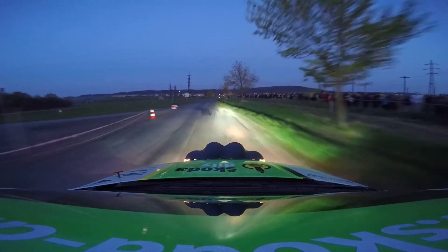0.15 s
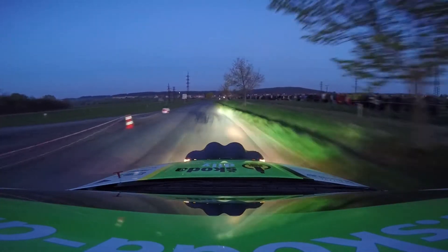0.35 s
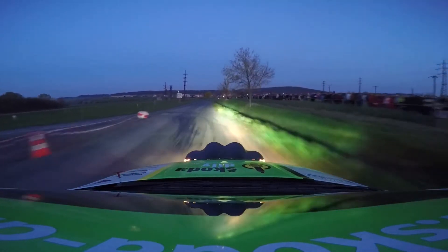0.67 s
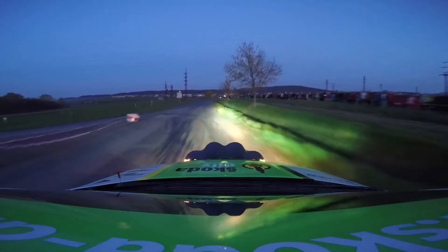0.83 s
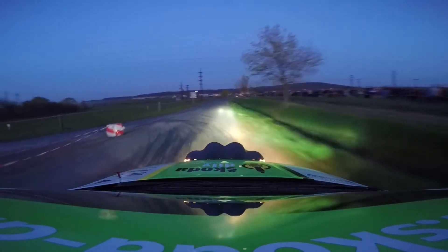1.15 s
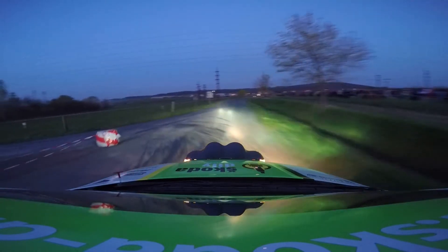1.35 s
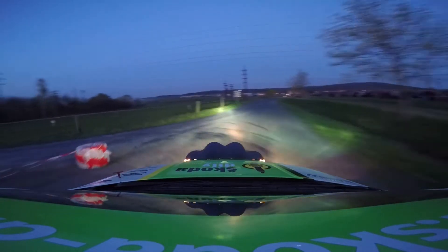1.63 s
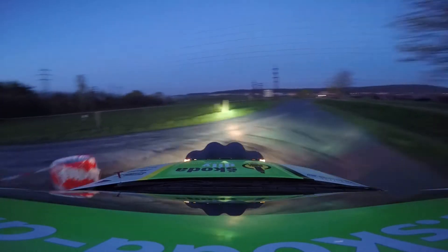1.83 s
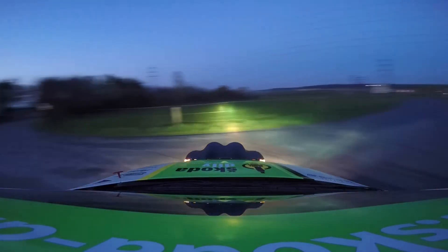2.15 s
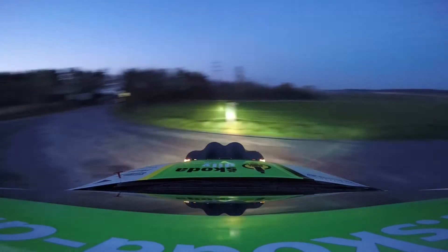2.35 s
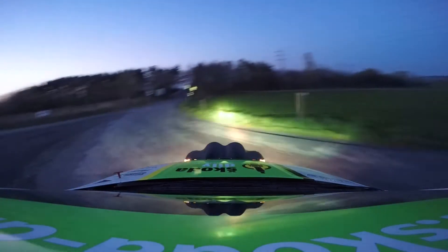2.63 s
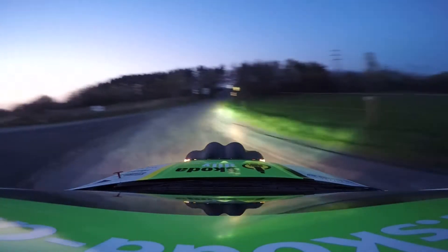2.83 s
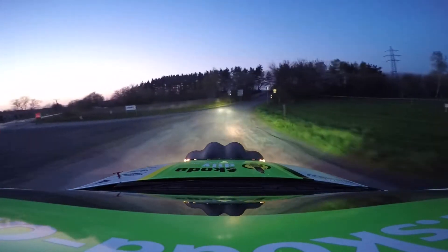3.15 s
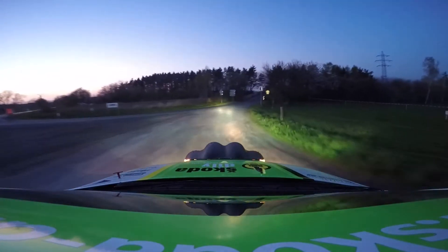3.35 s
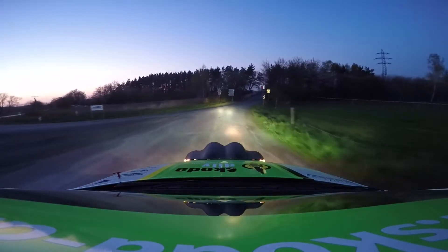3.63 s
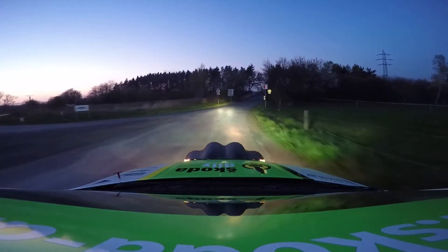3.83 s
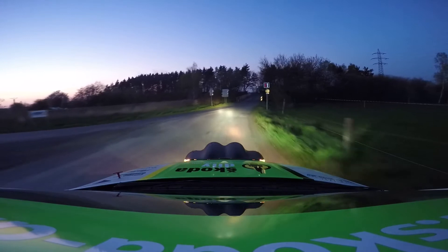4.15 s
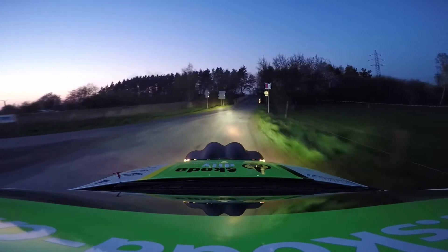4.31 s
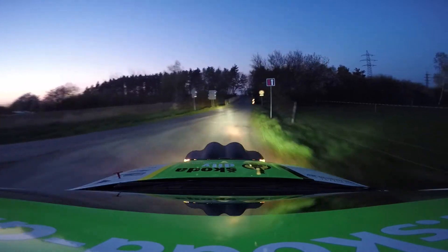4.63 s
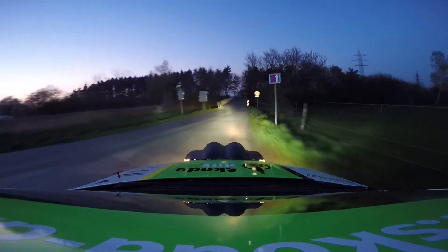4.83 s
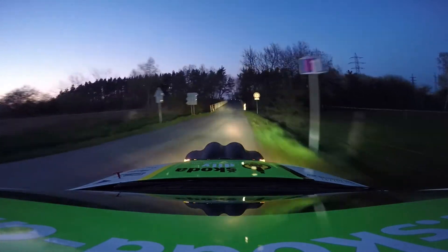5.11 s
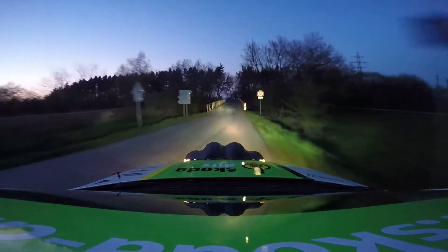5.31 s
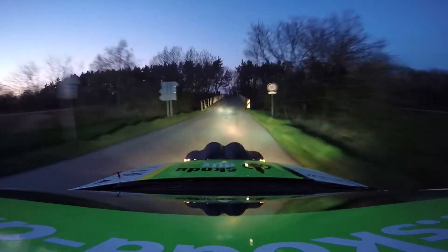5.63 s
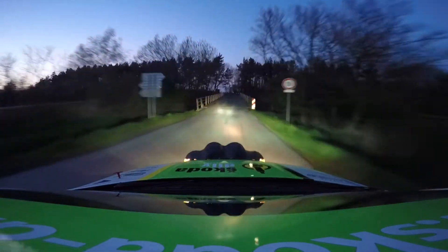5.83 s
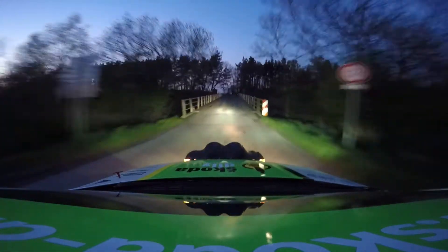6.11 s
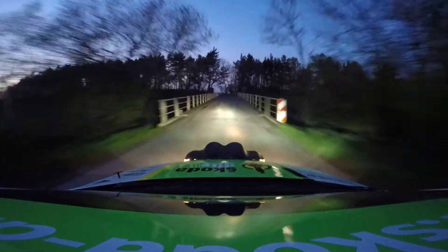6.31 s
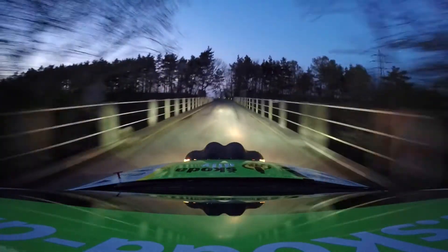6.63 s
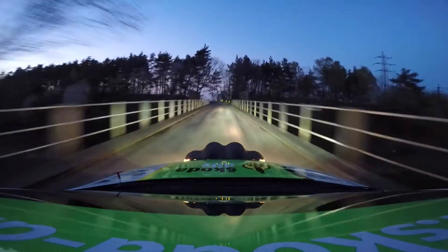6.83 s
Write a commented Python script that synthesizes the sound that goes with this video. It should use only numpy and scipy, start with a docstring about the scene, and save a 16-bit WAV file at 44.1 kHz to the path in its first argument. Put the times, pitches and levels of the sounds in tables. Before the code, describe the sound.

A four-cylinder rally car engine drones through a booming exhaust, heard close from the car's roof. The pitch sinks as it brakes for a hairpin, with three throttle blips and tyres scrubbing and chirping. The wheels spin and shudder as it accelerates, the revs climbing to an upshift that sets off a rapid string of exhaust bangs and cracks. The engine then pulls again under rising wind, with mechanical clatter behind it.

```python
"""A four-cylinder engine drones through a booming exhaust, heard from the roof of a rally car.
The car brakes for a hairpin and scrubs round it; its tyres stick and slip, judder, chirp and shudder.
It accelerates away, and at the upshift unburnt fuel bangs in the exhaust. Then the engine pulls again
under rising wind. Behind it the block clatters, a panel buzzes and the turbocharger hisses."""
import sys
import numpy as np
from scipy import signal
from scipy.fft import rfft, irfft
from scipy.io import wavfile
from scipy.ndimage import uniform_filter1d

SR = 44100
rng = np.random.default_rng(int(sys.argv[2]) if len(sys.argv) > 2 else 0)


def output_pcm(signal):
    """Save a mono or channel-first signal as 16-bit PCM at the path in sys.argv[1].

    Samples are clipped to [-1, 1] before scaling.
    """
    pcm = np.clip(np.atleast_2d(signal).T, -1, 1) * 32767
    wavfile.write(sys.argv[1], SR, np.round(pcm).astype(np.int16))


N = 306936
T = np.arange(N) / SR
MID_FIRING_HZ = 80


# Engine speed through braking, three blips, pull away, upshift: time_s, firing_hz
ENGINE_SPEED = [(0, 123.5), (.33, 121.6), (.5, 113.3), (.65, 108.6), (.9, 94.5), (1.1, 88), (1.3, 77.6),
                (1.42, 80), (1.75, 67.5), (2, 58.6), (2.19, 55.5), (2.36, 74.9), (2.47, 52), (2.62, 61.1),
                (2.8, 52.9), (2.95, 65.4), (3.1, 49.5), (3.25, 56), (3.75, 68), (4, 75.1), (4.25, 84),
                (4.68, 105.5), (4.85, 137.8), (5.25, 178), (5.7, 160), (5.8, 106), (6.3, 106),
                (6.52, 116.2), (6.96, 127)]
# Throttle load on the exhaust (effort) and on the block (strain): time_s, effort_db, strain_db
ENGINE_LOAD = [(0, -5, -4.5), (.42, 1, -0.5), (.85, -14.5, -13), (1.05, -14, -10.5), (1.35, -3.5, -5),
               (1.7, -8, -8.5), (2.12, -6, -6), (2.4, 0.5, 4), (2.6, -9, -6), (3.45, -8, -7),
               (3.7, -10.5, 0), (4.55, -1, -4.5), (4.75, -10.5, -8), (5.28, 4, 3), (5.7, -10.5, -9.5),
               (6.3, -11, -9.5), (6.55, -17, -7), (6.96, -10.5, -9.5)]

def engine_state():
    """Firing rate, running count of firings, and the two loads that follow the throttle."""
    firing_hz = curves(ENGINE_SPEED)[0] * (1 + .002 * wander(15))
    effort_db, strain_db = curves(ENGINE_LOAD)
    return firing_hz, np.cumsum(firing_hz) / SR, effort_db, strain_db


# Firing tone across the pipe's resonances, at 0 dB effort: firing_hz, level_db
DRONE_LEVELS = [(50, -17.5), (68, -16), (86, -14.5), (105, -7.5), (124, -13.5), (135, -24), (158, -25.5),
                (178, -19.5)]
# Firing tone dropouts, brief under braking, long at the upshift: start_s, length_s, depth_db
DROPOUTS = [(0.796, 0.14, -13.5), (0.959, 0.077, -30), (1.587, 0.15, -10), (5.292, 1.18, -21.5)]

def exhaust(firings, firing_hz, effort_db):
    """The pipe sounds the firing tone, the other engine orders and its own boom."""
    dropout_db = sum(db * ramped(start, length, ramp_s=.072) for start, length, db in DROPOUTS)
    burble_db = 2.8 * (1 - steadiness(firing_hz)) * wander(19)
    drone_gain = gain_at(DRONE_LEVELS, firing_hz) * amp(.2 * effort_db + dropout_db + burble_db)
    drone = drone_gain * np.sqrt(2) * np.sin(2 * np.pi * firings)
    boom = pipe_boom() * driven(effort_db, firing_hz, base_db=-20.5, db_per_load_db=.2, db_per_oct=-.8)
    orders_gain = driven(effort_db, firing_hz, base_db=-17, db_per_load_db=.5, db_per_oct=0)
    orders = orders_gain * engine_orders(firings, firing_hz)
    return drone + amp(.31 * dropout_db) * (orders + boom)


def pipe_boom():
    """Uneven combustion stirs the pipe's low resonance."""
    boom = narrow_band(noise(), [(102.9, 22.6, 0)])
    local_power = uniform_filter1d(boom ** 2, size=6000)
    return boom / np.sqrt(local_power + .026)


# Tones of unequal cylinders: firing_multiple, level_db
ORDERS = [(.25, -3), (.5, -10), (.75, -9.5), (1.5, -18), (2, 1.5), (2.5, -10), (3, -4), (4, -9)]
# Exhaust pipe response: freq_hz, gain_db
PIPE_RESPONSE = [(30, -17), (70, -11.5), (108, 9.5), (135, -5), (150, -14.5), (177, -6.5), (215, -24.5),
                 (340, -15.5), (500, -7.5), (700, -30)]

def engine_orders(firings, firing_hz, waver=.32, smear_rad=.16):
    """Orders swell as they sweep the pipe's resonances; uneven timing smears the higher ones."""
    tones = np.zeros(N)
    for multiple, db in ORDERS:
        gain = amp(db) * gain_at(PIPE_RESPONSE, firing_hz * multiple) * (1 + waver * wander(12))
        phase = multiple * (2 * np.pi * firings + smear_rad * wander(24))
        tones += gain * np.sin(phase)
    return tones


# Gas puff spectrum: freq_hz, gain_db
RASP_SPECTRUM = [(100, -25), (220, -3.5), (300, 1), (360, 2.5), (490, 3), (560, -1.5), (800, -2),
                 (1150, -14), (1700, -10), (3000, -46)]

def exhaust_rasp(firings, firing_hz, stroke, effort_db):
    """Each firing puffs gas out of the pipe."""
    puffs = cycle_noise(firings, firing_hz) * (.5 + stroke) * lope(firings)
    gain = driven(effort_db, firing_hz, base_db=-31, db_per_load_db=.43, db_per_oct=2.5)
    return gain * unit_rms(colour(puffs, RASP_SPECTRUM))


def cycle_noise(firings, firing_hz, size=1024):
    """Gas noise that recurs every four firings, partly renewed each cycle."""
    position = firings / 4
    cycles = rng.standard_normal((int(position[-1]) + 2, size))
    alike = np.interp(np.arange(len(cycles)), position, steadiness(firing_hz))
    for k in range(1, len(cycles)):
        cycles[k] = alike[k] * cycles[k - 1] + np.sqrt(1 - alike[k] ** 2) * cycles[k]
    gas = np.interp(position * size, np.arange(cycles.size), cycles.ravel())
    return unit_rms(gas * np.sqrt(firing_hz))


# Likeness of successive engine cycles: firing_hz, correlation
CYCLE_LIKENESS = [(52, 0.28), (85, 0.46), (118, 0.74), (150, 0.6), (178, 0.2)]

def steadiness(firing_hz):
    """Combustion is most regular at middling revs, lumpy below and ragged near the limit."""
    return np.interp(firing_hz, *np.transpose(CYCLE_LIKENESS))


def lope(firings):
    """One cylinder is stronger than the other three."""
    return 1 + .11 * np.cos(np.pi / 2 * firings)


# Explosions in the exhaust: start_s, boom_db, bark_db
BACKFIRES = [(5.324, 1, -17.5), (5.350, 3.5, -9), (5.404, -0.5, -20.5), (5.439, -2, -20.5),
             (5.528, -5.5, -39), (5.753, 0, -20.5), (5.846, -1, -13.5), (5.915, -3.5, -13),
             (5.990, -1.5, -17.5), (6.063, -4, -20), (6.127, -5, -21.5), (6.198, -4, -27), (6.269, -7, -25),
             (6.34, -4.5, -17.5), (6.401, -4.5, -24.5)]
# Pressure jump spectrum: freq_hz, gain_db
BARK_SPECTRUM = [(100, 10.5), (170, -9), (300, 5.5), (450, 3), (750, -0.5), (1150, -5.5), (1600, -16),
                 (2300, -16), (3000, -20.5), (5000, -48), (12000, -57.5)]

def backfires(boom_hz=101, boom_attack_s=.0025, boom_decay_s=.039, bark_decay_s=.025, echo_s=.0058):
    """A pressure jump barks out of the exhaust and leaves the pipe ringing."""
    mix, t = np.zeros(N), T[:SR // 4]
    boom_envelope = np.exp(-t / boom_decay_s) * (1 - np.exp(-t / boom_attack_s))
    boom = -np.sin(2 * np.pi * boom_hz * t) * boom_envelope
    for start, boom_db, bark_db in BACKFIRES:
        burst = rng.standard_normal(len(t)) * np.exp(-t / bark_decay_s)
        burst[0] -= 24
        burst[round(echo_s * SR)] += 15  # the jump returns inverted from the pipe's far end
        bark = colour(burst, BARK_SPECTRUM)
        add(mix, start, amp(boom_db) * boom + amp(bark_db) * bark / np.std(bark[:SR // 100]))
    return mix


# Cracks at the tailpipe: start_s, peak_db
TAILPIPE_CRACKS = [(5.352, -12), (5.3649, -9), (5.4393, -12), (5.8516, -9), (5.8673, -16), (5.8808, -9),
                   (5.918, -17), (5.923, -10.5), (5.9469, -10), (5.987, -19), (6.0224, -11), (6.0597, -4.5),
                   (6.082, -15), (6.0913, -5), (6.145, -18), (6.1733, -17.5), (6.3415, -24)]
# Crack spectrum: freq_hz, gain_db
CRACK_SPECTRUM = [(150, 13), (500, 8.5), (1200, 2.5), (2700, -6.5), (4000, -21), (7000, -29.5),
                  (14000, -46)]

def tailpipe_cracks(decay_s=.0031):
    """Sharp pressure spikes, each with a short tail of noise."""
    mix, t = np.zeros(N), T[:SR // 4]
    for start, peak_db in TAILPIPE_CRACKS:
        burst = rng.standard_normal(len(t)) * np.exp(-t / decay_s)
        burst[0] -= 8
        crack = colour(burst, CRACK_SPECTRUM)
        add(mix, start, amp(peak_db) * crack / abs(crack).max())
    return mix


# Short tyre slips: start_s, length_s, scrub_db, squeal_db
TYRE_SLIPS = [(1.103, 0.0095, -27.5, -39), (1.145, 0.018, -27.5, -49), (1.256, 0.038, -30, -47),
              (1.338, 0.022, -22, -37), (1.475, 0.079, -25, -35), (1.803, 0.011, -22.5, -49),
              (1.894, 0.098, -25, -19), (2.433, 0.074, -14.5, -35), (3.115, 0.063, -30.5, -55),
              (3.499, 0.036, -35.5, -34)]
# Tread and squeal resonances: pitch_hz, width_hz, gain_db
TREAD_MODES = [(465, 40, -6), (531, 25, -8), (912, 35, 0), (1050, 35, 0), (1235, 30, -8), (1428, 40, -1),
               (1568, 40, -4), (1755, 45, -4), (1857, 35, 3), (2190, 40, -5), (2289, 16, -2),
               (2372, 25, -4), (2489, 16, -1), (2561, 14, -1), (2720, 40, -11), (3085, 45, -6),
               (3250, 55, -8), (3670, 50, -6), (4390, 70, -5)]
SQUEAL_MODES = [(924, 18, -3), (1523, 22, -1), (1610, 25, -4), (1708, 30, 2), (1796, 22, 0), (1854, 20, -2),
                (1988, 28, -4), (2173, 18, -8), (2357, 30, -2), (2473, 20, 0), (3240, 50, -13)]
# Radiation of tread ring, squeal and grit: freq_hz, gain_db
TREAD_SPECTRUM = [(400, 3), (800, 5.5), (2600, -1.5), (2850, 2.5), (3250, -3), (3600, -13), (4400, -13.5),
                  (5300, -25), (12000, -41)]
SQUEAL_SPECTRUM = [(700, 2.5), (1500, 5), (2500, 5), (3200, -5.5), (8000, -32)]
GRIT_SPECTRUM = [(240, -28), (400, -6), (615, 1), (1040, 0.5), (1290, -1), (1840, 0), (2070, -2.5),
                 (2580, -11), (2860, -32), (3130, -21.5), (4010, -38.5), (4450, -29), (9000, -47.5),
                 (11700, -87), (19800, -120)]
SPIN_START_S, SPIN_LENGTH_S = 3.495, .82

def tyres(judder_db=3, judder_hz=163, fade_db_per_s=49):
    """Rubber sticks and slips in a rapid judder that rings the tread; a harder slip squeals."""
    spin = amp(-27.5) * held(SPIN_START_S, SPIN_LENGTH_S, attack_s=.044, release_s=.23) + surges()
    slide = amp(-42) * ramped(start_s=1.42, length_s=3.65, ramp_s=.23)  # light scrub all through the bend
    squeal = amp(-10.5) * spin
    for start, length, scrub_db, squeal_db in TYRE_SLIPS:
        bite = amp(scrub_db - fade_db_per_s * abs(T - start))
        slide += bite * held(start, length, attack_s=.0056, release_s=.021)
        squeal += amp(squeal_db) * held(start, length, attack_s=.0015, release_s=.011)
    judder = amp(judder_db * wander(judder_hz))
    tread = unit_rms(colour(ring(noise() * judder, TREAD_MODES), TREAD_SPECTRUM))
    grit = unit_rms(colour(noise() * judder, GRIT_SPECTRUM))
    chirp = unit_rms(colour(ring(noise() * judder, SQUEAL_MODES), SQUEAL_SPECTRUM))
    grind = amp(-5) * slide + amp(-11) * spin
    return amp(-5) * (slide + spin) * tread + grind * grit + squeal * chirp


# Wheelspin surges: start_s, length_s, level_db
SPIN_SURGES = [(3.54, 0.072, -15), (3.801, 0.092, -17), (4.043, 0.056, -14.5)]

def surges():
    """Each surge of wheelspin swells, holds briefly and ebbs."""
    return sum(amp(db) * held(start, length, attack_s=.035, release_s=.04)
               for start, length, db in SPIN_SURGES)


def wheel_shudder(base_hz=129, lift_hz=11.15):
    """The wheels hum as the car powers out of the bend; each surge lifts the pitch."""
    surge = surges()
    pitch_hz = base_hz + lift_hz * np.sqrt(surge / surge.max())
    envelope = held(SPIN_START_S, SPIN_LENGTH_S, attack_s=.041, release_s=.07)
    hum = np.sqrt(2) * np.sin(2 * np.pi * np.cumsum(pitch_hz) / SR)
    return envelope * amp(-17.5 + 2 * wander(60)) * hum


# Block rattle spectrum: freq_hz, gain_db
CLATTER_SPECTRUM = [(600, -13.5), (1150, -9), (1400, -2.5), (1850, 0), (2100, -5), (2550, -12.5),
                    (2900, -18.5), (3200, -13.5), (3550, -28.5), (4200, -21), (4900, -22.5), (5400, -32),
                    (7000, -31.5), (7500, -42.5), (12500, -40.5), (14000, -50)]
# Panel and cover resonances: pitch_hz, width_hz, gain_db
PANEL_MODES = [(487, 25, -4), (920, 30, -8), (1057, 35, -8), (1422, 35, -4), (1527, 35, -7), (1740, 40, -2),
               (1857, 28, 2), (2358, 18, -4), (3085, 50, -6), (4145, 60, -5), (4950, 200, -3)]

def block_clatter(firings, firing_hz, stroke, strain_db):
    """Each firing rattles the block; low revs shake the panels most."""
    rattle = cycle_noise(firings, firing_hz) + .65 * noise()
    knocks = colour(rattle * (2.7 + stroke) * lope(firings), CLATTER_SPECTRUM)
    shake = amp(-2.5 - 12 * np.log2(firing_hz / MID_FIRING_HZ))
    clatter = (knocks + shake * ring(knocks, PANEL_MODES)) / np.sqrt(1 + .66 * shake)
    gain = driven(strain_db, firing_hz, base_db=-30.5, db_per_load_db=.9, db_per_oct=-.3)
    return gain * unit_rms(clatter)


# Panel buzzes in the bend and on rising revs: centre_s, half_length_s, level_db
BUZZ_SWELLS = [(2.01, 0.055, -29), (2.34, 0.067, -29.5), (3, 0.035, -38), (4.52, 0.19, -33.5),
               (6.82, 0.17, -37)]
# Buzzing panel resonances: pitch_hz, width_hz, gain_db
BUZZ_RESONANCES = [(1800, 95, -0.5), (1866, 51, 0)]

def panel_buzz(firings):
    """A panel, shaken at every firing, rings in a narrow band."""
    shaking = noise() * (1 + .55 * np.cos(2 * np.pi * firings))
    return swells(BUZZ_SWELLS) * narrow_band(shaking, BUZZ_RESONANCES)


# Air rush, rising and falling with the car's speed: time_s, level_db
AIR_LEVELS = [(0, -37.5), (.45, -35.5), (1.1, -53), (1.8, -53.5), (3.45, -55), (4.2, -45.5), (5.25, -41),
              (6.2, -44), (6.96, -35.5)]
# Air rush spectrum: freq_hz, gain_db
AIR_SPECTRUM = [(1500, -15.5), (2500, 2.5), (2900, -1.5), (3300, 2.5), (3900, -1), (4300, -2),
                (5150, -14.5), (6100, -10.5), (7300, -24.5), (8100, -17), (9200, -25), (10500, -22),
                (11400, -35), (15000, -35.5)]

def air_rush(firings, stroke):
    """Rushing air hisses, pulsing with the firings."""
    hiss = unit_rms(colour(noise() * (1 + .66 * stroke) * lope(firings), AIR_SPECTRUM))
    return amp(curves(AIR_LEVELS)[0] + 1.8 * wander(35)) * hiss


# Gusts: centre_s, half_length_s, level_db
WIND_GUSTS = [(.15, 0.21, -27.5), (1.476, 0.032, -30), (1.764, 0.069, -32), (5.26, 0.091, -22),
              (6, .2, -34), (6.94, .15, -33)]
# Wind rumble spectrum: freq_hz, gain_db
BUFFET_SPECTRUM = [(8, -9), (25, -4.5), (45, -1.5), (80, 1.5), (200, -12.5), (400, -37)]

def wind_buffet(lull_db=-43.5):
    """Gusts buffet the microphone with an uneven rumble."""
    rumble = unit_rms(colour(noise(), BUFFET_SPECTRUM)) * amp(6.4 * wander(9.5))
    return (amp(lull_db) + swells(WIND_GUSTS)) * rumble


# Turbocharger hiss as boost builds and falls: time_s, level_db
BOOST_LEVELS = [(2.1, -81), (2.34, -57), (2.65, -67), (3.6, -70.5), (4.45, -51.5), (4.8, -66), (5.4, -72),
                (6.96, -89)]
# Intake hiss spectrum: freq_hz, gain_db
INTAKE_SPECTRUM = [(4500, -13.5), (5700, -2.5), (6900, 2.5), (7350, -7), (8300, -4.5), (9300, -9.5),
                   (10500, -10), (11300, -14), (12400, -7.5), (13200, -16), (14300, -14), (15200, -29)]
# Hoarse whistles as the throttle shuts: centre_s, half_length_s, level_db
FLUTTER_SWELLS = [(.84, 0.02, -43.5), (1.03, .035, -48)]
# Whistle resonance: pitch_hz, width_hz, gain_db
FLUTTER_RESONANCE = [(3670, 800, 0)]

def turbo():
    """The compressor draws air in a wide, high hiss and flutters when the driver lifts."""
    boost = amp(curves(BOOST_LEVELS)[0] + .8 * wander(40))
    hiss = boost * unit_rms(colour(noise(), INTAKE_SPECTRUM))
    flutter = swells(FLUTTER_SWELLS) * narrow_band(noise(), FLUTTER_RESONANCE)
    return hiss + flutter


def driven(load_db, firing_hz, base_db, db_per_load_db, db_per_oct):
    """Gain of an engine sound that follows load and speed."""
    return amp(base_db + db_per_load_db * load_db + db_per_oct * np.log2(firing_hz / MID_FIRING_HZ))


def amp(db):
    """Decibels to gain."""
    return 10 ** (np.asarray(db) / 20)


def unit_rms(x):
    """Scales to an rms of one."""
    return x / np.sqrt(np.mean(x ** 2) + 1e-20)


def curves(rows):
    """Each column after the first, joined by straight lines in time."""
    times, *columns = np.transpose(rows)
    return [np.interp(T, times, column) for column in columns]


def gain_at(spectrum, hz):
    """Gain of a spectrum at the given frequencies."""
    freq_hz, db = np.transpose(spectrum)
    return amp(np.interp(np.log(hz + 1), np.log(freq_hz + 1), db))


def colour(x, spectrum, size=8192):
    """Minimum-phase filter with the given spectrum, falling away past its ends."""
    hz = abs(np.fft.fftfreq(size, 1 / SR))
    low_hz, high_hz = spectrum[0][0] / 2, spectrum[-1][0] * 2
    skirts = 1 / (1 + (hz / high_hz) ** 4) / (1 + (low_hz / (hz + 1)) ** 4)
    log_gain = np.log(gain_at(spectrum, hz) * skirts + 1e-5)
    response = np.exp(np.conj(signal.hilbert(log_gain)))
    return signal.oaconvolve(x, irfft(response[:size // 2 + 1]))[:len(x)]


def ring(x, modes):
    """Passes x through a bank of resonances."""
    return sum(amp(db) * signal.lfilter(*signal.iirpeak(hz, hz / width_hz, fs=SR), x)
               for hz, width_hz, db in modes)


def narrow_band(x, modes):
    """Two passes through the resonances, at unit rms."""
    return unit_rms(ring(ring(x, modes), modes))


def noise():
    """White noise for the whole scene."""
    return rng.standard_normal(N)


def wander(rate_hz):
    """Smooth random motion up to the given rate."""
    hz = np.fft.rfftfreq(N // 32, 32 / SR)
    spectrum = rfft(rng.standard_normal(N // 32)) / (1 + (hz / rate_hz) ** 4)
    slow = unit_rms(irfft(spectrum))
    return np.interp(T, np.linspace(0, T[-1], len(slow)), slow)


def held(start_s, length_s, attack_s, release_s):
    """Envelope that rises, holds and dies away."""
    t = np.maximum(T - start_s, 0)
    return (1 - np.exp(-t / attack_s)) * np.exp(-np.maximum(t - length_s, 0) / release_s)


def ramped(start_s, length_s, ramp_s):
    """Window with straight ramps at both ends."""
    return np.clip(np.minimum(T - start_s, start_s + length_s - T) / ramp_s, 0, 1)


def swells(rows):
    """A bell-shaped rise and fall for each row."""
    return sum(amp(db) * np.exp(-((T - centre) / half_length) ** 2) for centre, half_length, db in rows)


def add(mix, start_s, sound):
    """Mixes a sound in at start_s."""
    part = mix[round(start_s * SR):][:len(sound)]
    part += sound[:len(part)]


def scene():
    """Engine, wind, tyres and backfires, all close by, in mono."""
    firing_hz, firings, effort_db, strain_db = engine_state()
    mix = exhaust(firings, firing_hz, effort_db)
    stroke = np.exp(-(firings % 1) / .5) * amp(2 * wander(30))  # one decaying pulse per firing
    mix += exhaust_rasp(firings, firing_hz, stroke, effort_db)
    mix += block_clatter(firings, firing_hz, stroke, strain_db)
    mix += air_rush(firings, stroke) + wind_buffet()
    mix += panel_buzz(firings) + turbo()
    mix += tyres() + wheel_shudder()
    mix += backfires() + tailpipe_cracks()
    return mix[None]


def record(dry, knee=.6, cutoff_hz=15200):
    """Rounds off the loudest bangs near full scale, then limits the band."""
    clean = np.clip(dry, -knee, knee)
    rounded = clean + (1 - knee) * np.tanh((dry - clean) / (1 - knee))
    lowpass = signal.firwin(511, cutoff_hz, window=("kaiser", 9), fs=SR)
    return signal.oaconvolve(rounded, lowpass[None], "same")


dry = scene()
out = record(dry)
output_pcm(out)
```